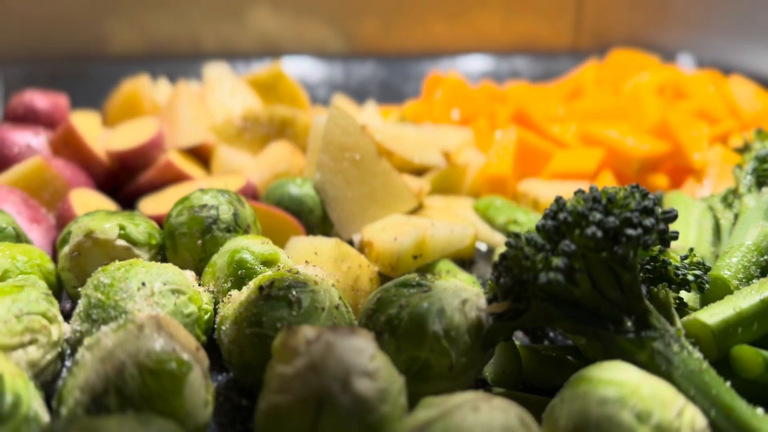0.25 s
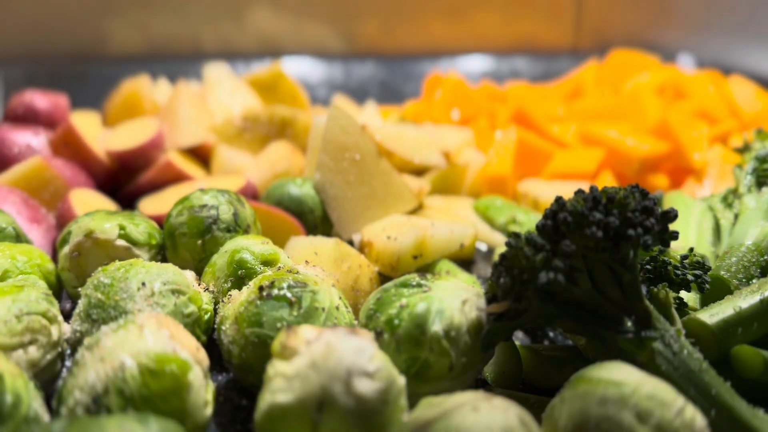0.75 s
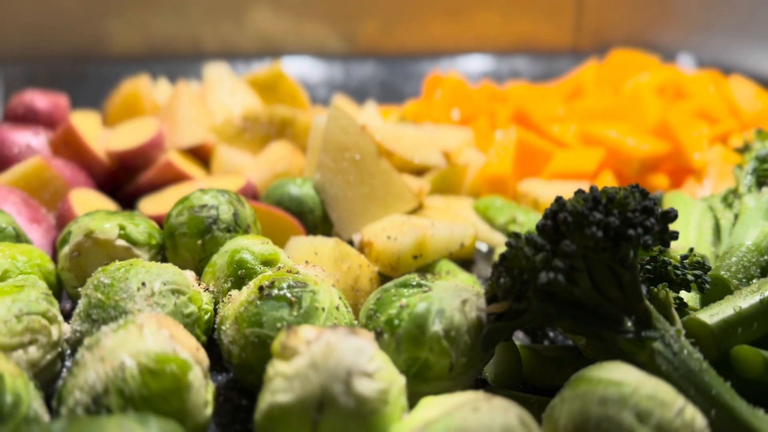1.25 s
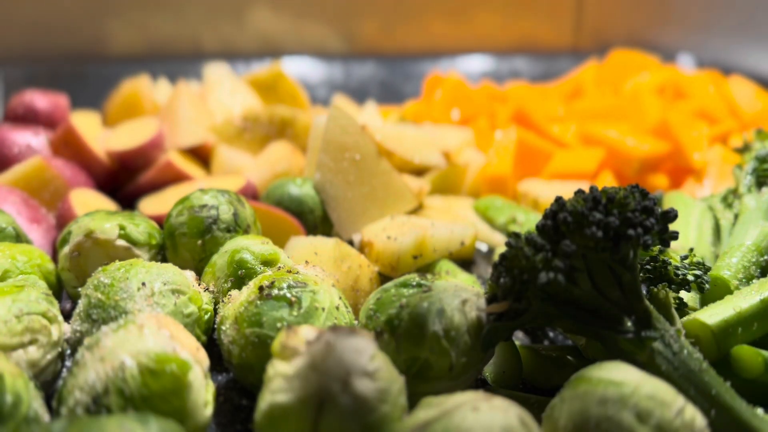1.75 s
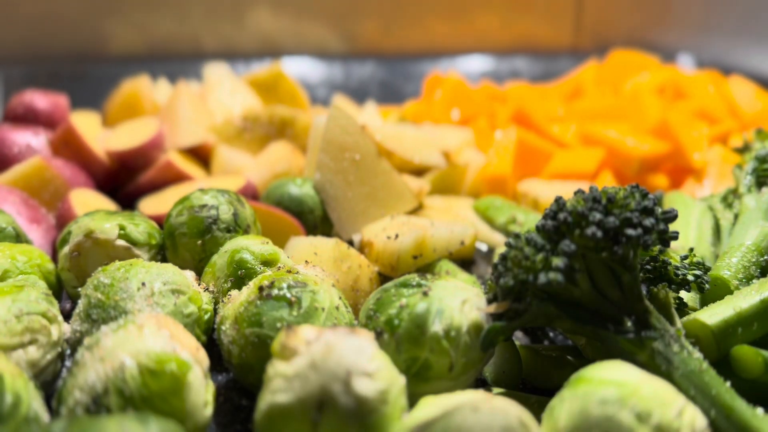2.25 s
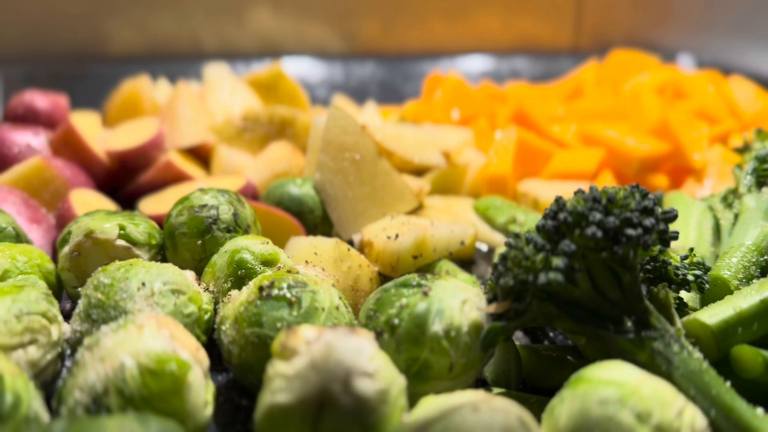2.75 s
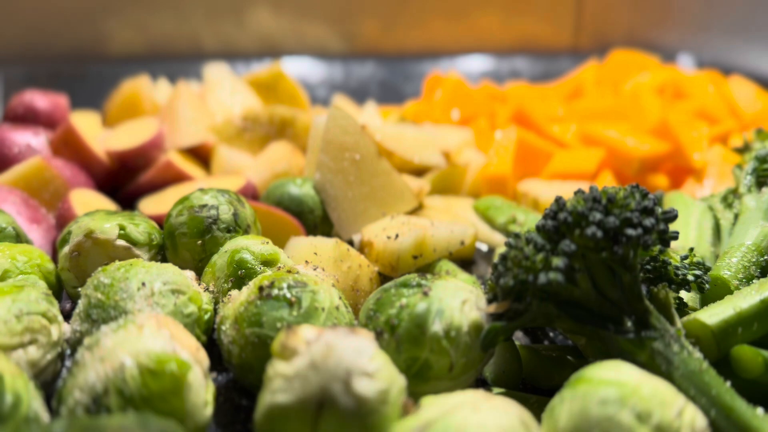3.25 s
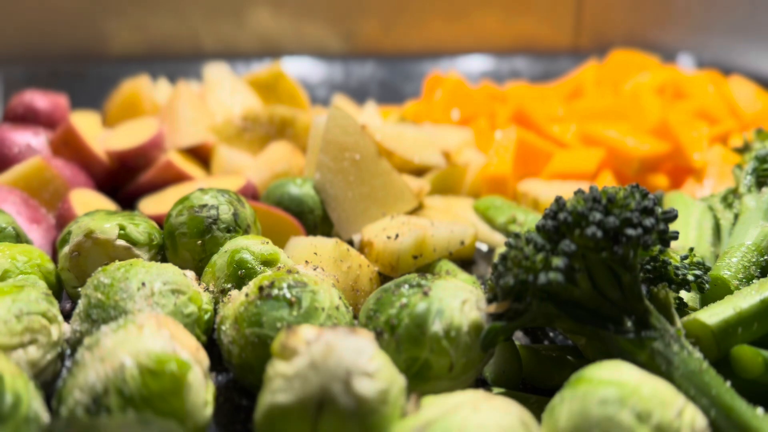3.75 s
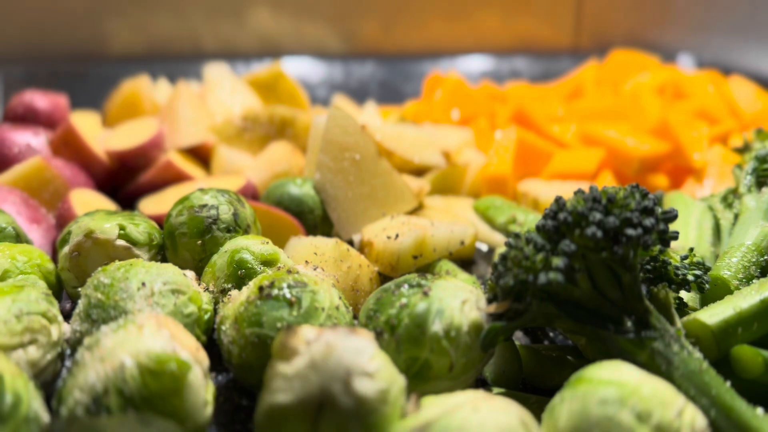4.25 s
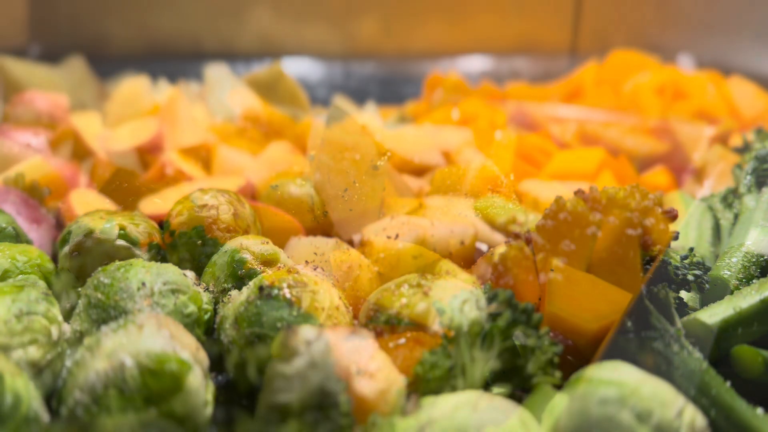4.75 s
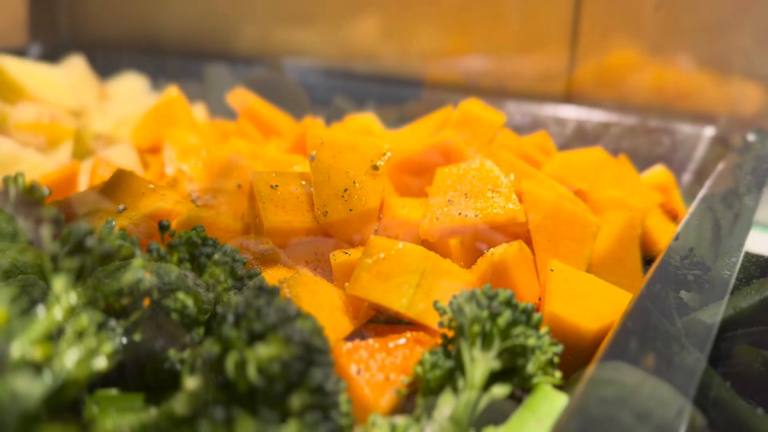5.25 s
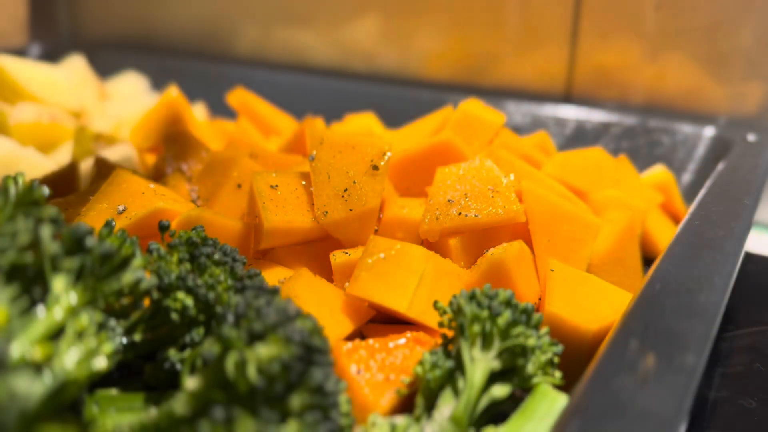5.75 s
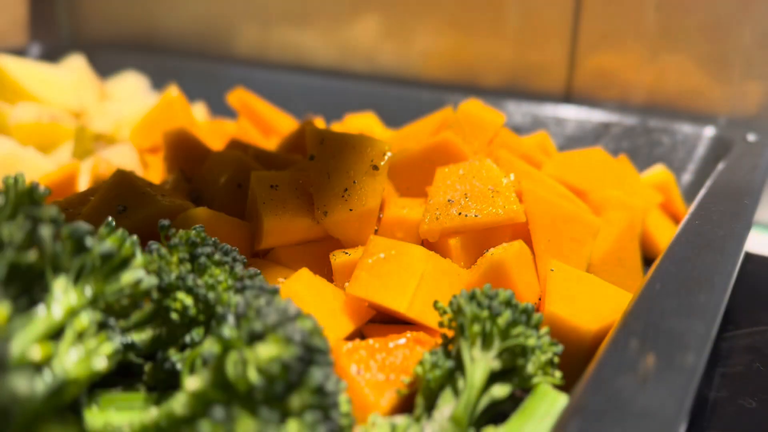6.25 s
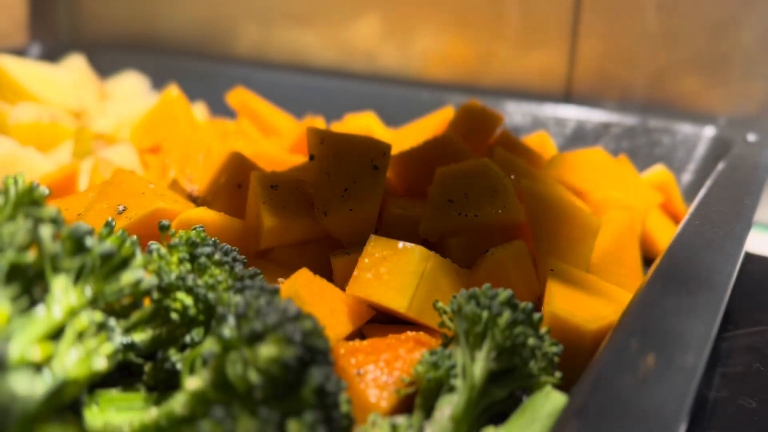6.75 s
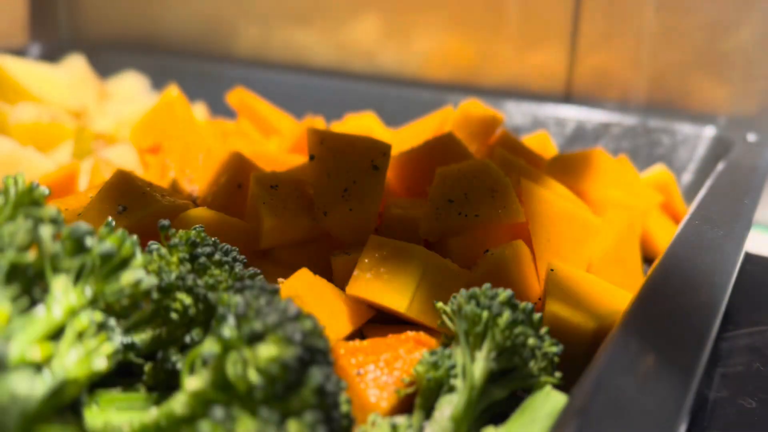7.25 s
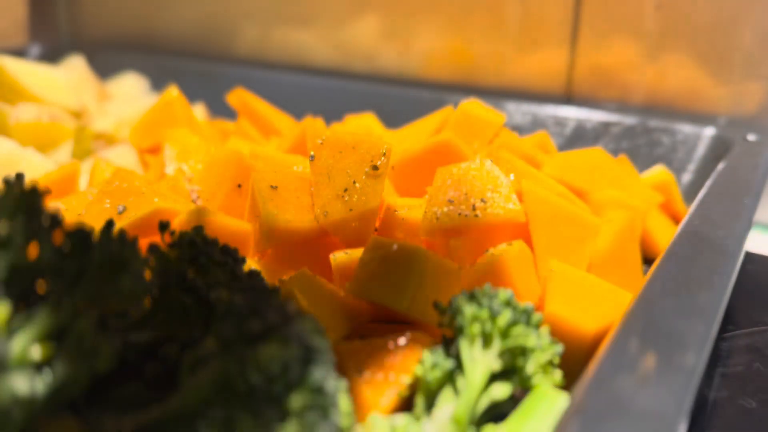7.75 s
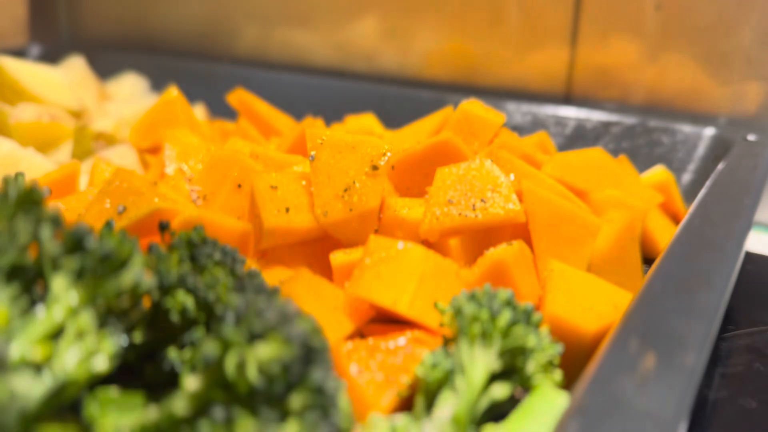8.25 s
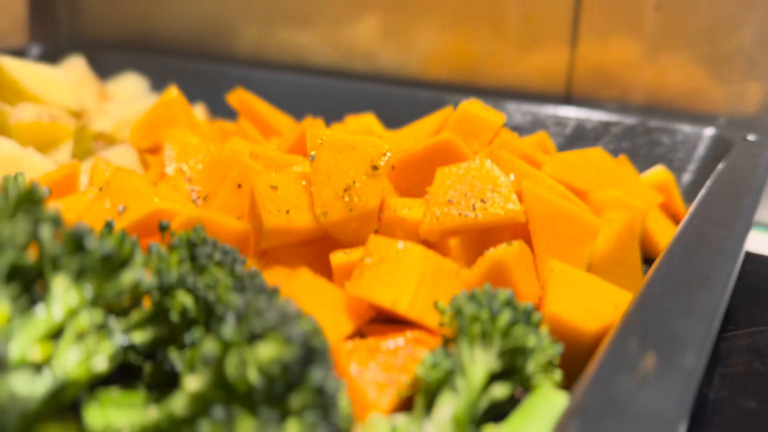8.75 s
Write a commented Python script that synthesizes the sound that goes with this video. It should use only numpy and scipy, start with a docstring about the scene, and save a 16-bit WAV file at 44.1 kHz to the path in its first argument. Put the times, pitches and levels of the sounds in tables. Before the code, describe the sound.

A wooden pepper mill is twisted by hand from the first moment to the end, about nine seconds, close to the microphone and slightly left. The twists come in a fast, uneven run, roughly three or four a second. Each is a short, gritty crunch with a light wooden rumble and a high sizzle. Peppercorns split in sharp clicks, standing out around 0.6, 1.1 and 1.7 seconds, while bits of husk tick in between. Between 4.5 and 5 seconds the grinding eases and its tone shifts slightly as the microphone changes place. Strong cracks follow at about 5.1, 5.7, 6.8, 7.4 and 8.5 seconds, the loudest at 6.8. At about 8.5 seconds something gives the counter a soft, low bump. Quick reflections off a steel tray and a short kitchen echo color the grinding. A faint, low refrigerator hum lies underneath throughout.

```python
"""In a kitchen, a pepper mill is twisted by hand close over a steel tray of vegetables.
Each twist crushes corns in the burr (the grinding teeth) and shakes the wooden mill; some crack loudly.
The mill wanders, so the tray's reflections keep changing; midway the microphone changes place.
Behind it a refrigerator hums, and something bumps the counter near the end."""
import sys
import numpy as np
from scipy import signal
from scipy.fft import rfft, irfft, next_fast_len
from scipy.io import wavfile
from scipy.ndimage import map_coordinates

SR = 44100
rng = np.random.default_rng(int(sys.argv[2]) if len(sys.argv) > 2 else 0)


def dump(signal):
    """Clip the signal to [-1, 1] and save it as 16-bit WAV at the path in sys.argv[1]."""
    limited = np.clip(np.atleast_2d(signal).T, -1, 1)
    pcm = np.round(limited * 32767).astype(np.int16)
    wavfile.write(sys.argv[1], SR, pcm)


N = 397782


def amp(db):
    """Turn decibels into a gain."""
    return 10 ** (np.asarray(db) / 20)


def unit(x):
    """Scale x to an average (rms) level of 1."""
    return x / np.sqrt(np.mean(x ** 2) + 1e-20)


def along(points, hz):
    """Read between (frequency, value) points on a log axis."""
    f, values = np.transpose(points)
    return np.interp(np.log(hz + 1), np.log(f + 1), values)


def curve(points):
    """Join (time, value) points into one value per sample."""
    return np.interp(np.arange(N) / SR, *np.transpose(points))


def wobble(rate):
    """A smooth curve through rate random values a second."""
    return map_coordinates(rng.standard_normal(int(N * rate / SR) + 4), [np.arange(N) * rate / SR])


def filtered(x, response):
    """Multiply each frequency in x by response(hz)."""
    size = next_fast_len(N + SR // 2)
    return irfft(rfft(x, size) * response(np.fft.rfftfreq(size, 1 / SR)), size)[..., :N]


def resonate(x, modes):
    """Let x ring at an object's resonances; white noise keeps its level."""
    def response(f):
        total = sum((-1) ** k * amp(db) * 1j * f * width / (centre ** 2 - f * f + 1j * f * width)
                    for k, (centre, width, db) in enumerate(modes))
        return total / np.sqrt(np.mean(abs(total) ** 2))
    return filtered(x, response)


def echoes(x, make_tails, hop):
    """Changing reflections: each overlapping piece of x gets a new left and right echo tail."""
    padded, out = np.pad(x, (hop, 2 * hop)), np.zeros((2, N + 2 * SR))
    for start in range(0, N + hop, hop):
        piece = padded[start:][:2 * hop] * signal.windows.hann(2 * hop, sym=False)
        reflected = signal.fftconvolve(piece[None], make_tails(), axes=1)
        out[:, start:][:, :reflected.shape[1]] += reflected
    return out[:, hop:hop + N]


# Tone of the room's air: f/Hz, relative level/dB
AIR_TONE = [(20, -10), (40, 0), (100, -2), (200, -23), (400, -23), (1200, -30.5), (2400, -27.5),
            (4000, -36.5), (16000, -49)]
# How alike the air is left and right: f/Hz, likeness/0-1
AIR_LIKENESS = [(60, 0.92), (300, 0.93), (1200, .2), (16000, .1)]
def kitchen_air():
    """Faint air noise, alike on both sides only in the bass."""
    def response(hz):
        spread = np.arccos(along(AIR_LIKENESS, hz)) / 2
        return amp(along(AIR_TONE, hz)) * [np.cos(spread), np.sin(spread)]
    mid, side = filtered(rng.standard_normal((2, N)), response)
    return amp(-65.5) * unit(np.array([mid + side, mid - side]))


# Loudness of the hum: t/s, relative level/dB
HUM_LEVELS = [(0, -68), (4.4, -66.5), (4.8, -72.5), (5.3, -63.5), (9.02, -62.5)]
def refrigerator(hum_hz=61):
    """A low hum that wavers in pitch and loudness."""
    phase = 2 * np.pi * np.cumsum(hum_hz + 2.7 * wobble(11)) / SR
    return amp(curve(HUM_LEVELS) + 5.5 + 1.1 * wobble(9)) * np.sin(phase)


# Knocks on the counter: t/s, f/Hz, level/dB, rise/s, time to fade 60 dB/s
COUNTER_KNOCKS = [(8.491, 129.7, -36, 0.056, 0.33), (8.551, 58, -37.5, 0.025, 0.17)]
def counter_bump():
    """The bumped counter gives soft, low tones that swell and die away."""
    t = np.arange(N) / SR
    out = np.zeros(N)
    for start, hz, db, rise, fade in COUNTER_KNOCKS:
        age = np.clip(t - start, 0, None)
        swell = np.clip(age / rise, 0, 1) * amp(db - 60 * np.clip(age - rise, 0, None) / fade)
        out += swell * np.sin(2 * np.pi * hz * age)
    return out


# How long the kitchen echoes: f/Hz, time to fade 60 dB/s
WALL_FADE = [(150, 0.49), (2000, 0.15), (6000, 0.38), (14000, 0.062)]
def wall_tails():
    """The walls answer a moment late, and each frequency dies at its own speed."""
    hz, t, noise = signal.stft(rng.standard_normal((2, SR // 3)), SR, nperseg=256)
    tails = signal.istft(noise * amp(-60 * t / along(WALL_FADE, hz)[:, None]), SR, nperseg=256)[1]
    return np.pad(tails, ((0, 0), (300, 0))) / np.linalg.norm(tails[0])


# How much louder the left side is: f/Hz, level/dB
LEFT_BOOST = [(60, 10), (300, 0.5), (700, 6), (2500, 2), (5000, 6.5), (7500, 0.5)]
# How far the right side's wave is ahead, one list per microphone place: f/Hz, phase/rad
RIGHT_LEADS = ([(400, 0), (1100, -1), (2000, -1), (3300, -2.4), (4100, 0)], [(500, 0), (1600, 1.1),
               (2000, 1.4), (2600, -1.6), (3400, -1.8), (4200, 0)])
def direct_sound(x, lead, treble_lead_s=0.00035, in_step_hz=8216):
    """Sound straight from the mill: louder on the left, with the treble earlier on the right."""
    def response(hz):
        treble = np.clip((hz - 6200) / 1500, 0, 1)
        phase = treble * 2 * np.pi * treble_lead_s * (hz - in_step_hz) + along(lead, hz)
        left = amp(along(LEFT_BOOST, hz) / 2) * np.exp(-1j * phase / 2)
        return np.array([left, 1 / left])
    return filtered(x, response)


# Tone of the tray's reflections: f/Hz, level/dB
TRAY_TONE = [(150, -12.5), (500, -6.5), (1200, 0.5), (2500, -1.5), (4600, 0), (6800, 4.7), (8000, -16.5),
             (16000, -14)]
def tray_reflections(x, fade_s=0.022):
    """Quick echoes off tray and vegetables, different on each side and changing as the mill wanders."""
    def make_tails():
        tails = rng.standard_normal((2, 700)) * amp(-60 * np.arange(700) / SR / fade_s)
        return tails / np.linalg.norm(tails, axis=1, keepdims=True)
    reflected = echoes(x, make_tails, hop=SR // 16)
    return filtered(reflected, lambda hz: amp(along(TRAY_TONE, hz) + along(LEFT_BOOST, hz) * [[.5], [-.5]]))


# The mill's tone at each microphone place: f/Hz, level/dB
FIRST_TONE = [(150, 3), (450, 2.5), (1300, -5), (2000, 7.5), (3500, 0), (4600, -6.5), (8000, -2.5),
              (12200, -6.5), (14000, 4.5), (15300, 7), (16200, -22)]
SECOND_TONE = [(150, 5), (350, 0.5), (1200, -1.5), (2000, 2.5), (3500, 7), (4600, -4.5), (8000, -1.5),
               (12400, -6.5), (14000, 4.5), (15300, 6.5), (16200, -20)]
# The microphone's move: t/s, share of the second place/0-1
MIC_MOVE = [(0, 0), (4.45, 0), (5.05, 1), (9.02, 1)]
def microphone_places(mill):
    """The mill fades out at the first place as it fades in, with another tone, at the second."""
    moved = curve(MIC_MOVE)
    first = filtered(mill * np.sqrt(1 - moved), lambda hz: amp(along(FIRST_TONE, hz)))
    second = filtered(mill * np.sqrt(moved), lambda hz: amp(along(SECOND_TONE, hz)))
    return first, second


# Groans of the shaft: middle t/s, half length/s, level/dB
GROANS = [(0.275, 0.051, -56), (0.84, 0.049, -56.5), (1.43, 0.17, -59), (1.953, 0.088, -58),
          (2.91, 0.072, -55.5), (4.123, 0.046, -55), (4.748, 0.045, -59.5), (5.122, 0.02, -59),
          (5.382, 0.082, -58), (6.519, 0.036, -44.5), (7.671, 0.014, -44.5), (7.93, 0.032, -54),
          (8.778, .05, -57.5)]
# The wood's lowest resonances: f/Hz, width/Hz, relative level/dB
SHAFT_MODES = [(233, 34, 0), (344.6, 57, -2.5)]
def shaft_groans():
    """The shaft rubs in the wood in short, low swells."""
    t = np.arange(N) / SR
    swell = sum(amp(db) * np.cos(np.pi / 2 * np.clip((t - middle) / half, -1, 1))
                for middle, half, db in GROANS)
    return resonate(swell * rng.standard_normal(N), SHAFT_MODES)


# Wrist pushes: t/s, hold/s, rise/s, relative crunch level/dB, rumble over it/dB, sizzle over it/dB
PUSHES = [(0, 0.011, 0.038, -43.5, -1.5, -3), (0.195, 0.078, 0.078, -52.5, 0, 0.5),
          (0.446, 0.023, 0.05, -48, -1.5, -4), (0.554, 0.03, 0.053, -51.5, -12, -4),
          (0.747, 0.098, 0.029, -49.5, -1, -6), (1.001, 0.027, 0.09, -53.5, -7, -6),
          (1.096, 0.014, 0.01, -36.5, -11.0, -11.5), (1.195, 0.024, 0.029, -56, -17.5, -4),
          (1.382, 0.094, 0.057, -47, -6.5, -4), (1.62, 0.063, 0.077, -46.0, -3.5, -7.0),
          (1.694, 0.063, 0.035, -49.5, -13.5, -5.5), (1.921, 0.033, 0.073, -52.5, -2.5, -1.5),
          (2.117, 0.062, 0.021, -54.5, -10, -6.0), (2.22, 0.06, 0.04, -67.5, -6, -2),
          (2.404, 0.04, 0.018, -67.5, -5, 5), (2.484, 0.09, 0.075, -52.5, -2.5, -1.0),
          (2.603, 0.039, 0.034, -47.5, -17, -12), (2.841, 0.1, 0.054, -52, -0.5, -0.5),
          (3.112, 0.095, 0.048, -52.5, -1, 1), (3.234, 0.052, 0.033, -46.5, -7.5, -3),
          (3.463, 0.08, 0.084, -53.0, 0.5, 1), (3.692, 0.048, 0.051, -55, -2, 1.5),
          (3.811, 0.028, 0.013, -45.5, -4.5, -2.5), (4.018, 0.13, 0.063, -56, -0.0, 1),
          (4.33, 0.029, 0.038, -56.5, -1.5, 1), (4.419, 0.045, 0.046, -45.5, -5.5, -8.0),
          (4.668, 0.11, 0.068, -60.5, -3, 2.5), (4.791, 0.059, 0.03, -61, -2, 11.5),
          (4.986, 0.051, 0.066, -61.5, 1.0, 1.5), (5.114, 0.036, 0.047, -37.5, -4.5, -5),
          (5.314, 0.095, 0.056, -52, 1.0, -1), (5.546, 0.048, 0.02, -54, 3.5, 2.5),
          (5.67, 0.051, 0.027, -42, -8.5, -4), (5.78, 0.015, 0.027, -52.5, 0, -4.5),
          (5.876, 0.082, 0.026, -52, 3, 2), (6.017, 0.024, 0.04, -72.5, 1, 10.5),
          (6.151, 0.015, 0.084, -51, 2.5, -0.5), (6.204, 0.074, 0.033, -40, -13.5, -13),
          (6.439, 0.1, 0.036, -55, 1.5, -2), (6.753, 0.035, 0.042, -50, 4, -5),
          (6.833, 0.075, 0.027, -43.5, -6, -7.0), (7.058, 0.086, 0.036, -50.5, 1.5, -4.5),
          (7.31, 0.033, 0.062, -49.0, -2.0, -6), (7.376, 0.054, 0.028, -40.0, -10, -6.5),
          (7.59, 0.097, 0.059, -49.5, 1, -4), (7.853, 0.059, 0.054, -50.5, 4, -7),
          (7.912, 0.082, 0.034, -44.5, -0.5, -2), (8.161, 0.043, 0.072, -51.5, 4.5, 2.5),
          (8.235, 0.036, 0.028, -58, 1, 2.5), (8.416, 0.042, 0.057, -48, -4.0, -4.5),
          (8.494, 0.053, 0.025, -41.0, -3.5, -4.5), (8.73, 0.09, 0.082, -49.5, 1.0, -1.5),
          (8.966, 0.09, 0.099, -47, -3.5, -2.5)]
SWING_DB, FALL_S = 29.5, 0.069  # at steepness 1 a push climbs this far, then drops as far in FALL_S
def wrist_pushes(level_db, steepness, early_s=0, extra_rise_s=0, bend=1):
    """Loudness over time: each push climbs, holds and falls; overlapping pushes add their power."""
    t = np.arange(0, N + 64, 64) / SR
    start, hold, rise = np.transpose(PUSHES)[:3, :, None]
    before = np.clip(start - early_s - t, 0, None) / (rise + extra_rise_s)
    after = np.clip(t - start - hold, 0, None) / FALL_S
    power = amp(level_db[:, None] - steepness * SWING_DB * (before + after) ** bend) ** 2
    return np.interp(np.arange(N) / SR, t, np.sqrt(power.sum(axis=0)))


def grit(per_second, spread_db, life_s, rubbing_db):
    """Strength of fragments breaking at random, many small and few large, over steady rubbing."""
    chance, size = rng.random((2, N))
    breaks = (chance < per_second / SR) * amp(-spread_db * np.log(1 - .995 * size))
    fading = signal.lfilter([1], [1, -np.exp(-1 / (life_s * SR))], breaks)
    return unit(unit(fading) + amp(rubbing_db))


# Resonances of the mill's body, its high ring, its wood and its burr: f/Hz, width/Hz, relative level/dB
BODY_MODES = [(1612, 530, 2), (1890, 435, 6), (2570, 520, 6), (2607, 625, -6.5)]
RING_MODES = [(4632, 580, 2.5), (6430, 620, -3), (7360, 1900, -3.5)]
WOOD_MODES = [(223, 145, -1.5), (427, 190, 1), (567, 242, 1), (815, 214, 0.5), (1140, 430, -4.5)]
BURR_MODES = [(8250, 1530, -1), (10705, 580, 6.5), (14640, 990, -14.5)]
def grinding():
    """One gritty force makes the mill crunch, rumble and ring; the burr sizzles with pepper dust."""
    push_db, wood_db, burr_db = np.transpose(PUSHES)[3:]
    fragments = grit(240, spread_db=4, life_s=0.0019, rubbing_db=2) * amp(2.77 * wobble(35))
    dust = unit(grit(240, spread_db=5.5, life_s=0.0027, rubbing_db=-9.5) + 0.97 * fragments)
    rub, hiss = rng.standard_normal((2, N))
    crunch = wrist_pushes(push_db - 3, steepness=0.95) * resonate(rub * fragments, BODY_MODES)
    rumble = wrist_pushes(push_db + wood_db + .3, steepness=1.18) * resonate(rub * fragments, WOOD_MODES)
    ring = wrist_pushes(push_db - 1.5 + 0.29 * burr_db, steepness=0.74, extra_rise_s=0.00415)
    ring *= resonate(rub * unit(fragments + 0.45 * dust), RING_MODES)
    sizzle_db = push_db + burr_db + 5.5
    # The burr sizzles a little before the corns grip.
    swell = wrist_pushes(sizzle_db, steepness=0.81, early_s=0.0066, extra_rise_s=0.0083)
    # Dust trickles on between pushes and runs dry ever faster.
    trickle = wrist_pushes(sizzle_db, steepness=.18, extra_rise_s=FALL_S, bend=1.8)
    trickle *= amp(np.interp(curve(MIC_MOVE), [0, 1], [-32.5, -15]))  # louder at the second place
    sizzle = (swell + trickle) * resonate(hiss * dust, BURR_MODES)
    return crunch + rumble + ring + sizzle


def split(t, db):
    """Force of one split: five quick jolts, closer in a weak crack, and pieces that rattle on."""
    force = (amp(-6.5 - 60 * t / 0.013) + amp(-15.5 - 60 * t / 0.091)) * rng.standard_normal(len(t))
    mean_gap_s = .0006 * 2 ** ((db + 15) / 16)  # 16 dB weaker splits twice as fast
    gaps = mean_gap_s * SR * rng.uniform(.3, 1.7, size=5)
    jolts = np.array([2.9, 3.04, 2.7, 1.93, 1.8]) * rng.choice([-1, 1], size=5)
    force[np.cumsum(np.ceil(gaps)).astype(int)] += jolts
    return force


# Resonances of wood struck near the burr and of a snapping husk: f/Hz, width/Hz, relative level/dB
KNOCK_MODES = [(545, 297, -4), (840, 264, 2), (1182, 236, 1)]
SNAP_MODES = [(8400, 820, 7.5), (10900, 1860, 11.5), (14940, 1200, -4.5)]
# How well each part of a crack reaches the air: body/dB, knock/dB, ring/dB, snap/dB
PART_GAINS = [-8, 4.5, 3, 4]
# Bits of husk ticking in the burr: t/s, level/dB
HUSK_TICKS = [(0.0986, -49.5), (1.2466, -44), (1.5721, -44.5), (1.8198, -56), (2.1176, -41), (2.4638, -36),
              (2.5591, -26.5), (2.6865, -41), (2.9526, -39), (3.0864, -38), (3.358, -43), (3.5728, -52),
              (3.7242, -33), (4.121, -32.5), (4.2363, -46), (4.2687, -55), (4.6059, -52), (4.755, -52),
              (4.787, -29), (4.9332, -37), (5.9095, -33), (6.009, -33), (6.0371, -36.5), (6.0874, -39.5),
              (6.126, -37), (6.1528, -26.5), (7.9383, -26), (8.6217, -36.5), (8.6472, -39), (8.7427, -32)]
# Corns cracking: t/s, relative body level/dB, knock over it/dB, ring over it/dB, snap over it/dB
CORN_CRACKS = [(0.0308, -37.5, -16, -4.5, -15), (0.2538, -29, -17, -24.5, -18),
               (0.2813, -29, -16, -22.5, -23), (0.4414, -26.5, -15, -29, -26),
               (0.4768, -30, -16.5, -22, -19), (0.5511, -19, -23, -2.5, -11),
               (0.5654, -17.5, -29.5, -15, -32), (0.7432, -45.5, -5.5, -22, -16),
               (0.9971, -34, -17.5, -25, -19), (1.0134, -26.5, -16, -30.5, -29.5),
               (1.0801, -34, -29.5, -21, -27), (1.0939, -19.5, -32.5, -10.5, -25.5),
               (1.1184, -17.5, -18.5, -24, -21), (1.1937, -36.5, -21, -22, -8),
               (1.2092, -28.5, -29, -13, -18), (1.4162, -27.5, -17.5, -7, -13),
               (1.4444, -30.5, -13, -19, -22), (1.6317, -26, -9.5, -24.5, -24),
               (1.6965, -18, -31.5, -11.5, -13), (1.7554, -36, -37, -19, -15), (2.1414, -41, -10, -4, -1.5),
               (2.2453, -49, -20, -17, -19), (2.5072, -35, -9, -16, -14), (2.6005, -27.5, -21, -12, -10),
               (2.6334, -22.5, -16.5, -10.5, -14), (2.8544, -32.5, -15, -21, -8),
               (3.1198, -37.5, -8.5, -19.5, -7), (3.2504, -31.5, -7.5, -12, -9),
               (3.491, -31.5, -6.5, -11, -12), (3.5503, -35.5, -4, -17, -11),
               (3.8082, -35.5, -17, -14, -10), (3.8302, -31, -12, -26, -12), (4.35, -31, -11, -25, -27),
               (4.4034, -45, -15, -14, -14), (4.4463, -26.5, -14, -15, -14),
               (5.0968, -21.5, -13.5, 1.5, -7), (5.1154, -17, -19, -9.5, -19), (5.1364, -29, -7, -4, 2),
               (5.656, -17.5, -21, 0, -5.5), (5.6664, -14.5, -18, -7.5, -14),
               (5.7049, -26.5, -14.5, -8, -6), (5.7874, -36, -9, -13, -10.5), (5.893, -29, -10, -13, -2),
               (5.9748, -34, -7.5, -21, -9), (6.1579, -34, -8, -12, -5), (6.2043, -28.5, -7.5, -18, -24),
               (6.2254, -36.5, -2.5, -14, -14), (6.2602, -20, -18, -10, -23), (6.4336, -43, -5, -17, -9.5),
               (6.4428, -36, -11, -19, -10), (6.7575, -32.5, 0, -18, -18), (6.8304, -9.5, -15, -4.5, -13.5),
               (6.8736, -32.5, -6, -3, -21), (6.8974, -25.5, -5, -16.5, -21),
               (6.9107, -20, -17.5, -14, -22), (7.0554, -32.5, -6.5, -22, -9), (7.3068, -38, 4.5, -10, -9),
               (7.3214, -42, 9.5, -13, -15), (7.3692, -16, -16.5, -2.5, 1.5), (7.424, -30, -14, -10, -11),
               (7.5976, -35.5, -9, -18.5, -13), (7.6206, -30, -10, -11, 1), (7.8315, -35.5, -4, -19, -3),
               (7.8386, -33.5, -5, -22, -17), (7.9089, -32.5, 4, -8, -3), (7.9668, -27.5, -6.5, -9, -4),
               (7.9952, -21, -16.5, -5, -0.5), (8.4801, -28, -27, -3.5, -8), (8.5031, -20, -22, -14.5, -19),
               (8.5124, -21, -16.5, -13.5, -17), (8.5455, -23, -17, -13.5, -8), (8.758, -31, -15, -10, -4),
               (8.9585, -34, -4.5, -6, -3)]
def cracks():
    """A corn gives way: the mill knocks and rings and the husk snaps; loose husks only snap."""
    t = np.arange(SR // 20) / SR
    parts = (BODY_MODES, KNOCK_MODES, RING_MODES, SNAP_MODES)
    forces = np.zeros((len(parts), N + len(t)))
    for start, db, *over_db in CORN_CRACKS:
        gains = amp(db + np.add([0, *over_db], PART_GAINS))
        forces[:, round(start * SR):][:, :len(t)] += gains[:, None] * split(t, db)
    snap_force = forces[3]
    for start, db in HUSK_TICKS:
        snap_force[round(start * SR):][:len(t)] += amp(db) * split(t, db)
    return sum(resonate(force[:N], modes) for force, modes in zip(forces, parts))


def scene():
    """The mill heard from two places in turn, its echoes and the kitchen around it."""
    first, second = microphone_places(grinding() + shaft_groans() + cracks())
    direct = direct_sound(first, RIGHT_LEADS[0]) + direct_sound(second, RIGHT_LEADS[1])
    tray = tray_reflections(first + second)
    walls = amp(-12.5) * echoes(first + second, wall_tails, hop=SR // 4)
    return direct + tray + walls + counter_bump() + kitchen_air() + refrigerator()


def record(dry):
    """Round off the loudest peaks and cut the very highest treble."""
    ceiling, top_hz = .85, 16500
    rounded = dry / (1 + abs(dry / ceiling) ** 4) ** (1 / 4)
    return filtered(rounded, lambda hz: hz < top_hz)


dry = scene()
out = record(dry)
dump(out)
```